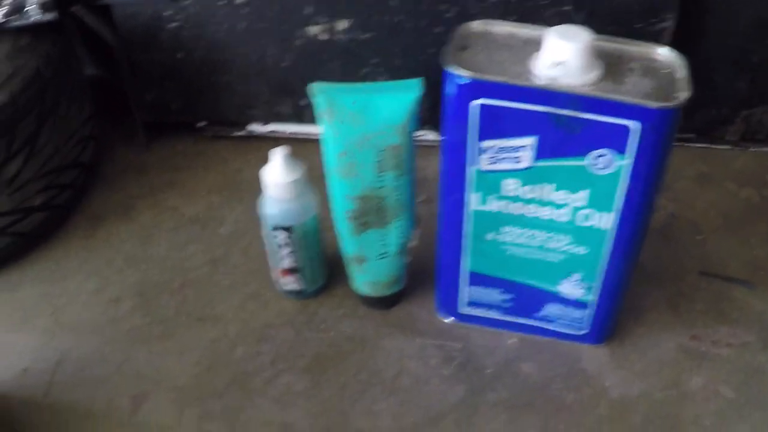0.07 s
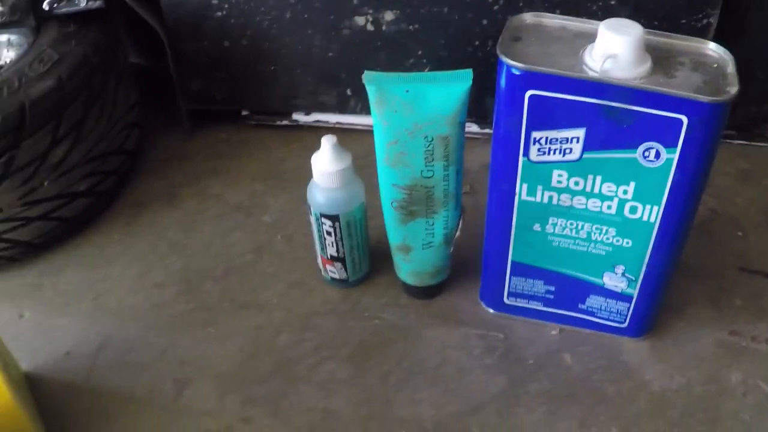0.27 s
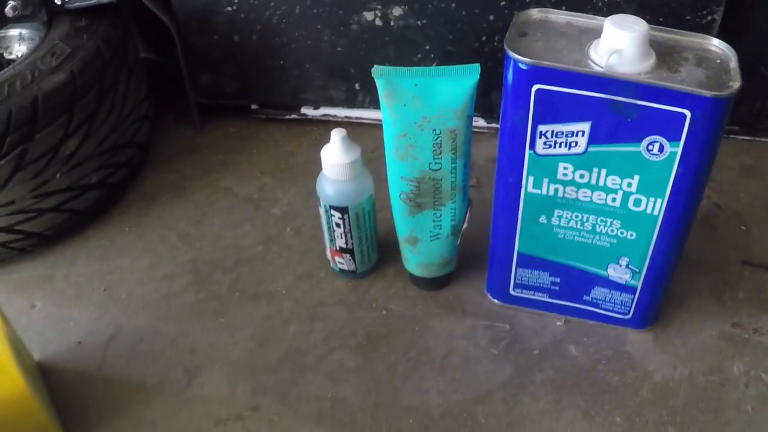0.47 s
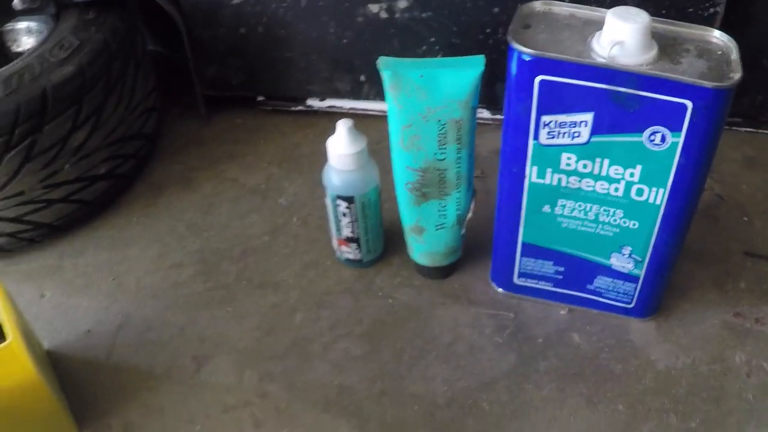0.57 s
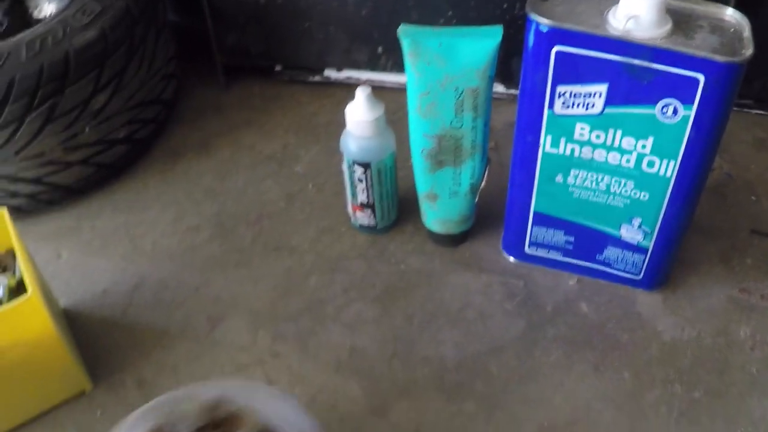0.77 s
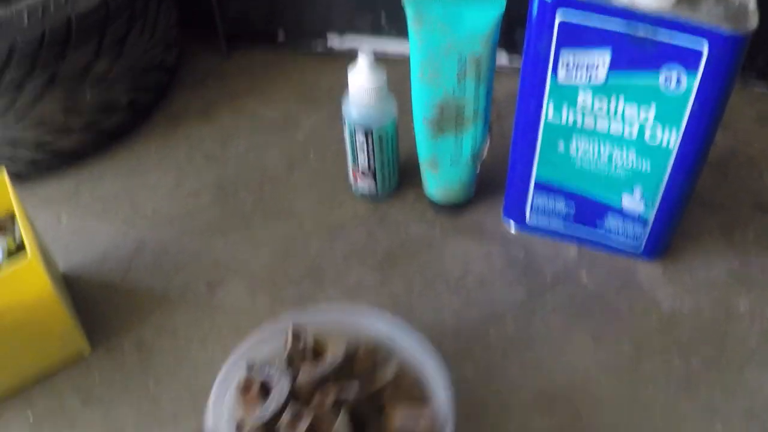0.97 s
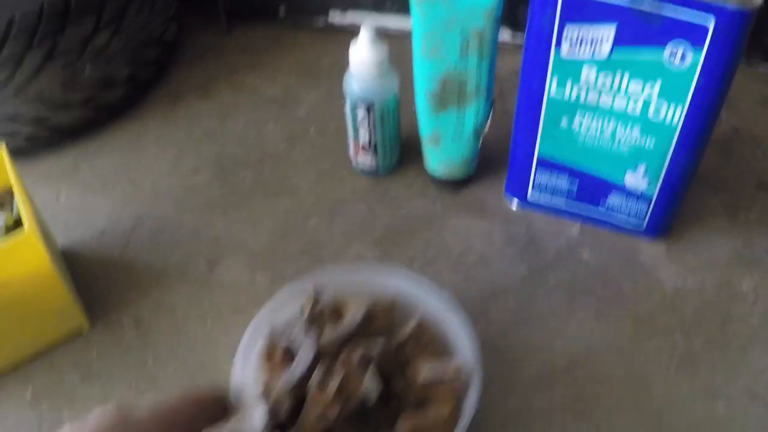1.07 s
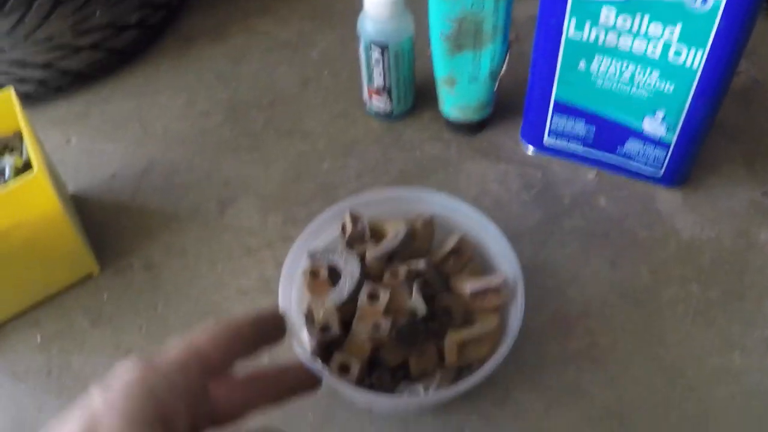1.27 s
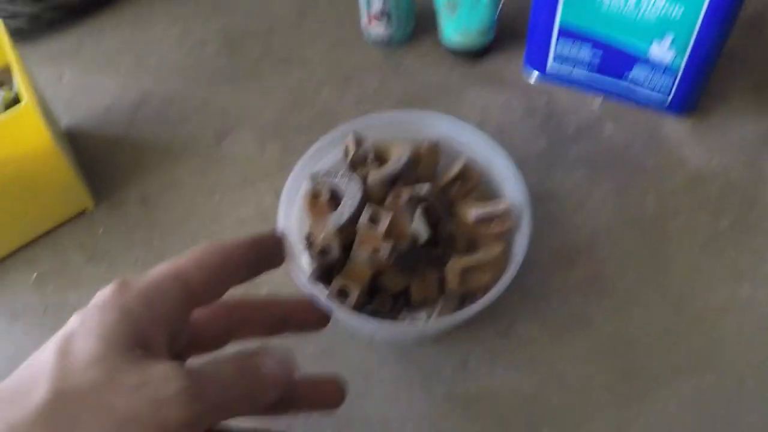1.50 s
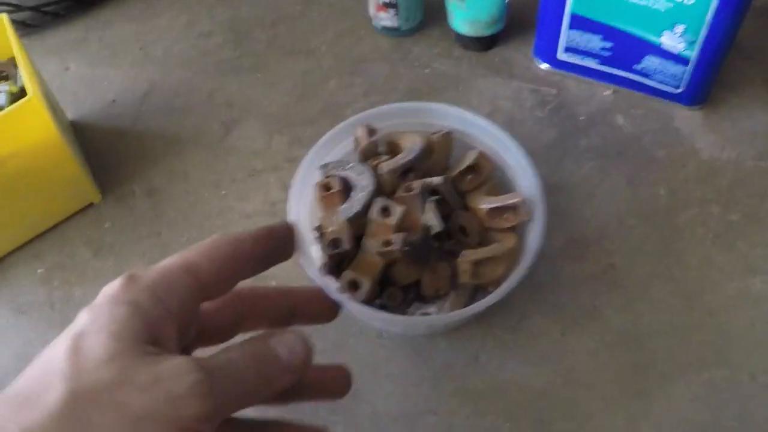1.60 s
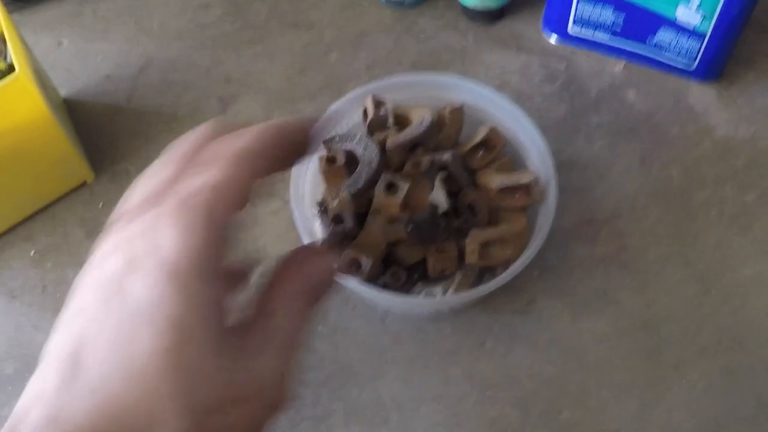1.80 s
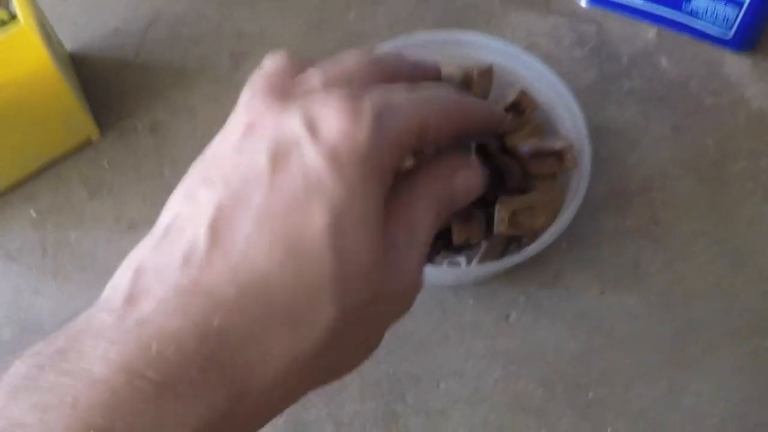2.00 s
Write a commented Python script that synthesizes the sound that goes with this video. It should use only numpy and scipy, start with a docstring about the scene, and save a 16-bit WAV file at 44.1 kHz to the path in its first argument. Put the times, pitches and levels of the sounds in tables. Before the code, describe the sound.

Close by in a quiet garage, a plastic tub scrapes across gritty concrete, growing louder as its metal parts rattle, then comes to rest. A few faint clicks follow as fingers touch the parts, over a low electrical hum.

```python
"""A garage with a concrete floor: a plastic tub of metal parts is pushed along, speeds up and comes to rest.
Grit crackles under its base and drums its walls; it catches on the floor and the packed parts knock
and jingle. Fingers then pick among the parts, over a low mains hum and the quiet air of the room."""
import sys
import numpy as np
from scipy import signal
from scipy.fft import rfft, irfft
from scipy.io import wavfile
from scipy.ndimage import map_coordinates

SR = 44100
rng = np.random.default_rng(int(sys.argv[2]) if len(sys.argv) > 2 else 0)


def put_to_file(sound):
    """Save the sound as 16-bit audio at rate SR, in the file named by the first command-line argument."""
    columns = np.atleast_2d(sound).T  # one column per channel
    safe = np.clip(columns, -1, 1)
    whole_steps = np.round(safe * 32767)
    wavfile.write(sys.argv[1], SR, whole_steps.astype(np.int16))


N = 90404

# Each row: time in seconds, scrape level in dB, rasp level in dB, body level in dB.
SLIDE_LEVELS = [(0, -53, -47.5, -58), (.08, -50, -55, -54), (.165, -41, -37.5, -52),
                (.195, -44.5, -42, -48), (0.243, -31.5, -34.5, -42.5), (.35, -32, -40, -44),
                (.47, -26, -32, -37), (.565, -25, -32.5, -36), (.61, -20, -30.5, -35),
                (0.742, -22, -26.5, -33.5), (0.781, -36, -37.5, -42), (0.819, -28, -31, -40.5),
                (.89, -26.5, -32, -37.5), (0.918, -34, -35.5, -42.5), (1.1, -37.5, -41.5, -41),
                (1.16, -42.5, -49, -53), (1.2, -50.5, -60, -60.5), (1.3, -56, -55, -57),
                (1.35, -97, -96, -71)]
# Spectra of scrape, rasp and sharp ticks. Each row: frequency in Hz, relative density in dB.
SCRAPE_SPECTRUM = [(1500, -25), (2700, -7), (3300, -5.5), (3600, -6.5), (3950, -0.5), (4450, 0),
                   (4900, 0.5), (5600, -5), (6500, -7), (7600, -19), (10000, -19.5), (15000, -38)]
RASP_SPECTRUM = [(1000, -38), (1450, -12.5), (1720, -6), (1880, -6.5), (2170, 5.5), (2600, 0), (3000, -7.5),
                 (3300, -2), (3700, -11)]
TICK_SPECTRUM = [(2000, -27), (4500, 1), (6500, 6.5), (9000, 2.5), (15000, 0)]
GRIT_PER_S, JUDDER_PER_S = 7000, 120


def slide(crunch_per_s=320, crunch_db=-17.5):
    """Grit under the juddering tub excites a bright scrape, a rasp and the body; coarse grains crack."""
    t, levels = np.arange(N) / SR, np.array(SLIDE_LEVELS)
    scrape_gain, rasp_gain, body_gain = (undb(np.interp(t, levels[:, 0], db)) for db in levels.T[1:])
    shared_judder = walk(JUDDER_PER_S)

    def judder(depth_db):
        return unit(undb(depth_db * (shared_judder + walk(JUDDER_PER_S)) / np.sqrt(2)))

    scrape = through(grit(GRIT_PER_S) * judder(depth_db=2) * scrape_gain, response(SCRAPE_SPECTRUM))
    rasp = through(grit(GRIT_PER_S) * judder(depth_db=3.5) * rasp_gain, response(RASP_SPECTRUM))
    crunch = through(grit(crunch_per_s) * scrape_gain * undb(crunch_db), response(TICK_SPECTRUM))
    drum = unit(tub_body(grit(GRIT_PER_S), t)) * judder(depth_db=3.5) * body_gain
    return scrape + rasp + crunch + drum


def grit(grains_per_s, spread_db=3):
    """Tiny random impacts of uneven size, rms 1."""
    hits = rng.random(N) < grains_per_s / SR
    sizes = undb(spread_db * np.clip(rng.standard_normal(N), -2, 2))
    return unit(hits * sizes * np.sign(rng.standard_normal(N)))


# Resonances of the tub's base and wall. Each row: frequency in Hz, relative density in dB.
BASE_SPECTRUM = [(150, -23), (300, -14.5), (400, -19.5), (490, -10.5), (590, 0), (690, 3), (800, -4.5),
                 (980, -15), (1300, -33), (2200, -30)]
WALL_SPECTRUM = [(950, -16.5), (1080, -4.5), (1200, 5.5), (1340, 1.5), (1480, 2.5), (1700, -1),
                 (2200, -20.5)]


def tub_body(force, t, start_pitch_ratio=1.277, settle_s=0.34, wall_db=-5.5):
    """The base drums and the wall rings at a steady pitch; as the tub moves off, the low drumming peak sinks in
    pitch."""
    pitch_ratio = 1 + (start_pitch_ratio - 1) * np.exp(-(t / settle_s) ** 2)
    base = through(force, response(BASE_SPECTRUM))
    gliding_base = map_coordinates(base, [np.cumsum(pitch_ratio)], mode="wrap")
    return gliding_base + undb(wall_db) * through(force, response(WALL_SPECTRUM))


# Each row: start in seconds, length in seconds, ring centre in Hz, ring width in Hz,
# ring level in dB, thud level in dB, tick level in dB.
KNOCK_EVENTS = [(.011, 0.0087, 3340, 3700, -37.5, -47.5, -40), (.097, 0.0052, 2550, 2220, -34, -39, -44),
                (.157, .012, 2170, 900, -40, -42, -64), (.219, 0.022, 1240, 497, -40, -42.5, -51),
                (.233, 0.0039, 3740, 3970, -26.5, -32.5, -28), (.2402, 0.0042, 3540, 4530, -22, -32, -37),
                (.295, .01, 1170, 300, -39, -36, -50), (.306, 0.01, 2960, 2800, -27.5, -39, -36),
                (.369, 0.0051, 4740, 2980, -30, -45, -29), (.381, 0.0062, 3440, 4040, -22.5, -25, -38),
                (.399, 0.0017, 4600, 1980, -22, -61, -28), (.447, 0.0059, 4500, 3000, -31, -31, -32.5),
                (.468, 0.017, 4800, 2500, -31, -31, -33), (.488, 0.0018, 4160, 2000, -18, -25, -42),
                (.523, 0.007, 5000, 1700, -22.5, -68, -47), (.584, 0.0053, 3550, 3500, -20.5, -28, -46),
                (.6055, 0.0036, 4560, 3460, -10.5, -32, -19.5), (.6236, 0.0013, 4600, 1500, -17, -20, -37),
                (.6455, 0.0026, 4040, 600, -12, -35, -46), (.667, 0.0013, 2370, 1010, -18, -31, -36),
                (.699, 0.012, 3950, 1220, -19, -30.5, -48), (.716, 0.018, 4050, 1200, -20.5, -35.5, -48),
                (.751, 0.0019, 2290, 915, -19, -40, -41), (.7938, 0.003, 5130, 3300, -15.5, -59, -24),
                (.807, 0.014, 2300, 900, -54, -32, -55), (.821, 0.0098, 4400, 2930, -28, -35, -43),
                (.88, 0.0027, 2660, 1800, -46, -28.5, -27), (.943, 0.0068, 2280, 1190, -32.5, -41, -42),
                (.958, 0.0035, 2170, 2000, -26, -37, -36.5), (.9803, 0.0032, 2400, 1270, -22, -41, -37),
                (1.0245, 0.0024, 2500, 2400, -22, -31.5, -26), (1.031, 0.0052, 4100, 4000, -30.5, -46, -52),
                (1.097, 0.01, 3600, 3800, -29.5, -33.5, -36.5),
                (1.1335, 0.0032, 4800, 3880, -28, -59, -29.5), (1.148, 0.0027, 4840, 3000, -49, -65, -37),
                (1.156, .005, 5500, 2950, -32, -65, -34.5), (1.2278, 0.0017, 2390, 418, -27, -44, -44),
                (1.293, 0.0023, 2600, 1000, -45, -57, -57), (1.3, 0.0017, 2600, 900, -44.5, -62, -70),
                (1.323, 0.0024, 6300, 2500, -56, -67, -59), (1.636, .002, 6000, 5000, -68, -73, -45.5),
                (1.656, 0.0027, 4800, 4000, -60, -66, -49.5), (1.681, 0.0028, 2120, 1200, -49.5, -72, -78),
                (1.893, 0.0029, 3000, 2050, -41.5, -54, -82), (1.9355, 0.011, 2140, 1280, -46, -46, -63),
                (1.972, 0.012, 2580, 2000, -56, -58, -65), (2.021, 0.0046, 2370, 1380, -49.5, -45, -84)]


def knocks(chatter_per_s=9000, min_release_s=0.0007):
    """The tub catches or parts knock: an impact and brief chatter drive a dead ring, a thud and a tick."""
    out, t = np.zeros(N + SR), np.arange(SR // 24) / SR
    chatter = np.tile(grit(chatter_per_s), 2)
    tick_response = response(TICK_SPECTRUM)
    for k, (start_s, length_s, ring_hz, width_hz, ring_db, thud_db, tick_db) in enumerate(KNOCK_EVENTS):
        envelope = np.exp(-np.maximum(t - 0.78 * length_s, 0) / (min_release_s + length_s / 6))
        contact = chatter[k * len(t):(k + 1) * len(t)] * envelope
        impact_ratio = undb(-7) * min(0.0022 / length_s, 1)  # long knocks are mostly chatter
        contact[0] += impact_ratio * np.linalg.norm(contact)
        low_hz = np.hypot(ring_hz, width_hz / 2) - width_hz / 2
        ring_band = signal.butter(2, [low_hz, low_hz + width_hz], "band", fs=SR, output="sos")
        ring = signal.sosfilt(ring_band, contact)
        thud = tub_body(contact, start_s + t)
        tick = through(contact, tick_response)
        onset = int(start_s * SR)
        for layer, db in ((ring, ring_db), (thud, thud_db), (tick, tick_db)):
            out[onset:onset + len(t)] += undb(db) * layer * np.sqrt(length_s * SR) / np.linalg.norm(layer)
    return out[:N]


# Each row: frequency in Hz, T60 in seconds, relative level in dB.
METAL_MODES = [(2048, 0.33, -1), (3600, .15, -54), (3902, 0.082, 8), (4130, 0.05, -18), (4354, 0.14, -11.5),
               (5300, 0.049, 30), (5578, 0.1, 11.5), (5950, 0.18, 10)]


def jingle(shaking, level_db=-18):
    """Shaken metal parts ring briefly, damped by each other."""
    t = np.arange(SR // 3) / SR
    ring = sum(undb(db) * np.exp(-np.log(1000) * t / t60_s) * np.sin(2 * np.pi * (hz * t + rng.random()))
               for hz, t60_s, db in METAL_MODES)
    return undb(level_db) * through(shaking, ring / np.linalg.norm(ring))


# Each row: centre in seconds, half-width in seconds, level in dB.
FINGER_BRUSHES = [(1.472, 0.013, -59.5), (1.608, 0.011, -56), (1.648, 0.02, -57), (1.96, 0.047, -60.5)]


def fingers():
    """Faint swells of friction as fingers brush the rim and the parts."""
    t = np.arange(N) / SR
    touch = sum(undb(db) * np.exp(-((t - centre_s) / half_width_s) ** 2)
                for centre_s, half_width_s, db in FINGER_BRUSHES)
    return through(grit(GRIT_PER_S) * touch, response(SCRAPE_SPECTRUM))


def garage(direct, early_decay_s=0.027, early_db=-13, tail_t60_s=0.12, tail_db=-24.5):
    """Quick echoes from the floor and things nearby, then a short dull tail."""
    t = np.arange(SR // 2) / SR
    early = rng.standard_normal(len(t)) * np.exp(-t / early_decay_s) * (t > 0.002)
    tail = rng.standard_normal(len(t)) * np.exp(-np.log(1000) * t / tail_t60_s) * (t > 0.01)
    tail = signal.sosfilt(signal.butter(1, 6000, fs=SR, output="sos"), tail)
    echoes = undb(early_db) * early / np.linalg.norm(early) + undb(tail_db) * tail / np.linalg.norm(tail)
    return direct + through(direct, echoes)


# Each row: frequency in Hz, rms level in dB.
HUM_TONES = [(58.5, -42.5), (177, -58), (236.5, -64), (305, -64), (1238, -70), (1297, -69.5), (2180, -70)]


def mains_hum(waver_db=1.54, waver_rad=0.14):
    """Low mains hum and a thin whine, each tone wavering in level and phase."""
    t = np.arange(N) / SR
    hum = np.zeros(N)
    for hz, db in HUM_TONES:
        amplitude = undb(db + waver_db * walk(7.6)) * np.sqrt(2)
        hum += amplitude * np.sin(2 * np.pi * hz * t + waver_rad * walk(6.1))
    return hum


# Each row: frequency in Hz, relative density in dB.
AIR_SPECTRUM = [(20, -3), (32, 0), (45, 1), (80, -11.5), (120, -10.5), (200, -25.5), (300, -24), (400, -27),
                (650, -24), (950, -32), (1700, -43), (2200, -36.5), (3900, -43.5), (5200, -36.5),
                (7200, -50), (15000, -51)]


def room_air(level_db=-42.5):
    """Steady low rumble and faint hiss."""
    spectrum = rfft(rng.standard_normal(N)) * rfft(response(AIR_SPECTRUM, size=16384), N)
    return undb(level_db) * unit(irfft(spectrum, N))


def undb(db):
    """Decibels to gain."""
    return 10 ** (np.asarray(db) / 20)


def unit(x):
    """Scale to rms 1."""
    return x / np.sqrt(np.mean(x ** 2) + 1e-20)


def walk(changes_per_s):
    """Smooth random curve with spread near 1."""
    points = rng.standard_normal(2048)
    return map_coordinates(points, [np.arange(N) / SR * changes_per_s], order=3, mode="wrap")


def response(spectrum, size=2048):
    """Minimum-phase impulse response of unit energy from (Hz, dB) points, rolling off past the ends."""
    hz, db = np.array(spectrum, float).T
    log_hz = np.log(np.maximum(np.fft.rfftfreq(size, 1 / SR), 1))
    beyond = np.maximum(np.log(hz[0]) - log_hz, 0) + np.maximum(log_hz - np.log(hz[-1]), 0)
    magnitude = undb(np.interp(log_hz, np.log(hz), db) - 20 * beyond)
    cepstrum = irfft(np.log(magnitude))
    cepstrum[1:size // 2] *= 2
    cepstrum[size // 2 + 1:] = 0
    impulse = irfft(np.exp(rfft(cepstrum)))
    return impulse / np.linalg.norm(impulse)


def through(x, impulse):
    """Pass a sound through an impulse response."""
    return signal.fftconvolve(x, impulse)[:len(x)]


def scene():
    """The tub and its load in the garage, over air and hum; mono."""
    tub = slide() + knocks() + fingers()
    return (garage(tub + jingle(tub)) + room_air() + mains_hum())[None, :]


def record(dry, cutoff_hz=15400):
    """Steep low-pass on the top treble."""
    return signal.sosfilt(signal.ellip(10, 0.2, 80, cutoff_hz, fs=SR, output="sos"), dry)


dry = scene()
out = record(dry)
put_to_file(out)
```